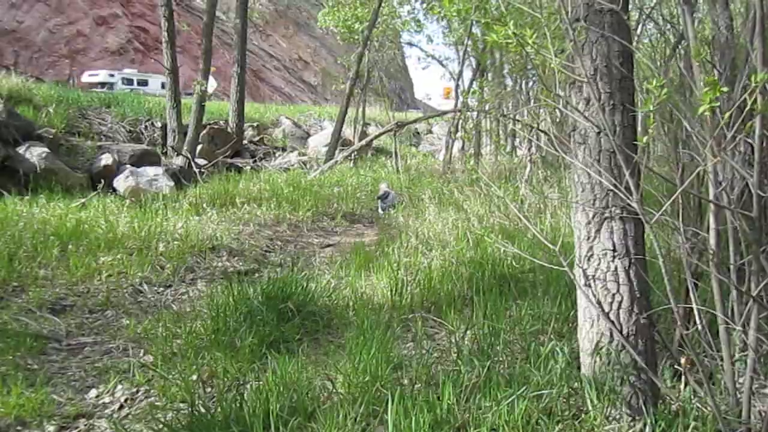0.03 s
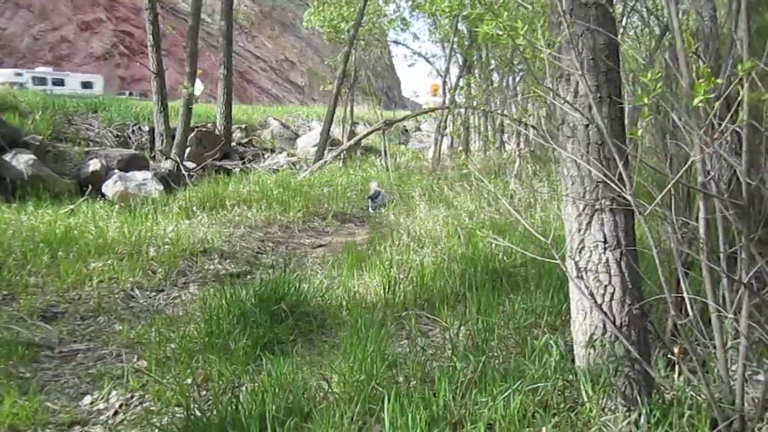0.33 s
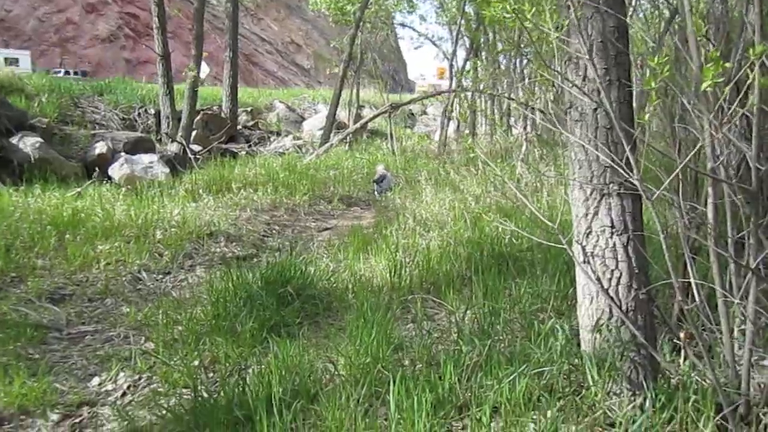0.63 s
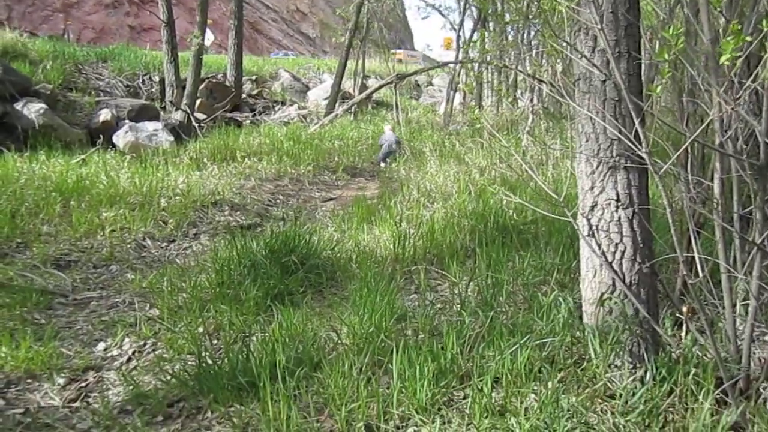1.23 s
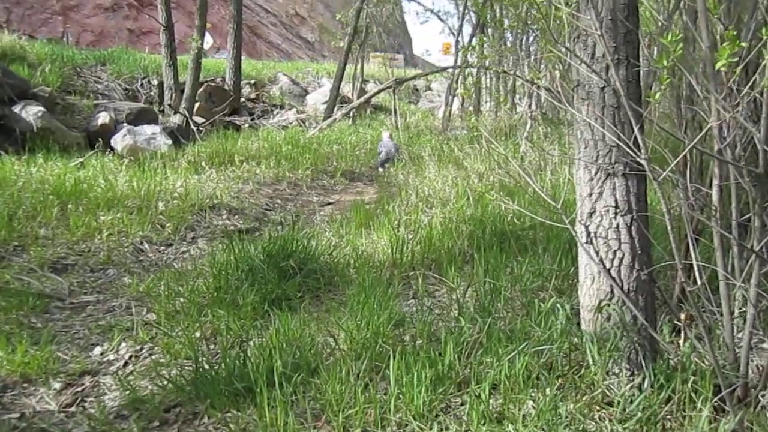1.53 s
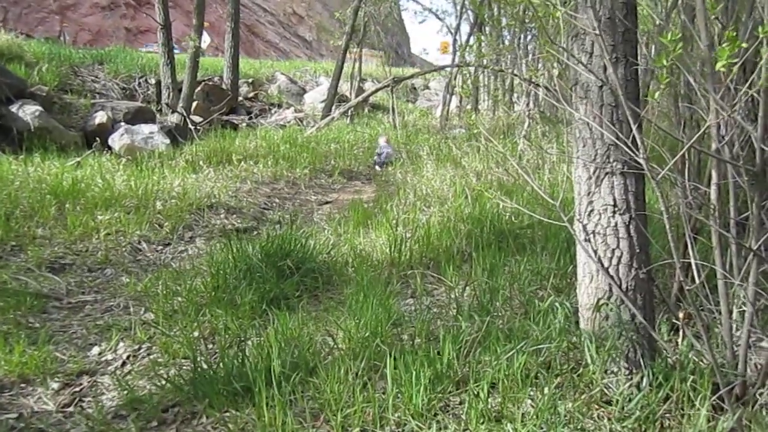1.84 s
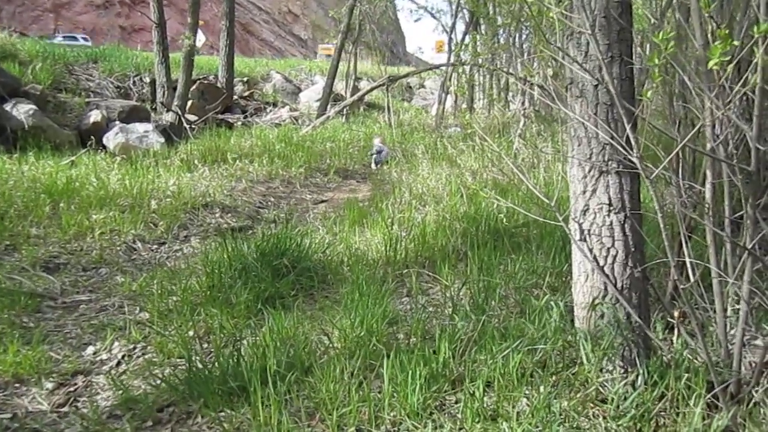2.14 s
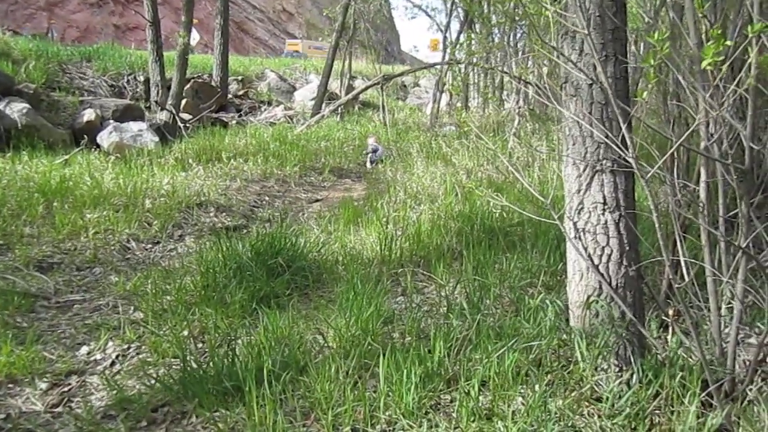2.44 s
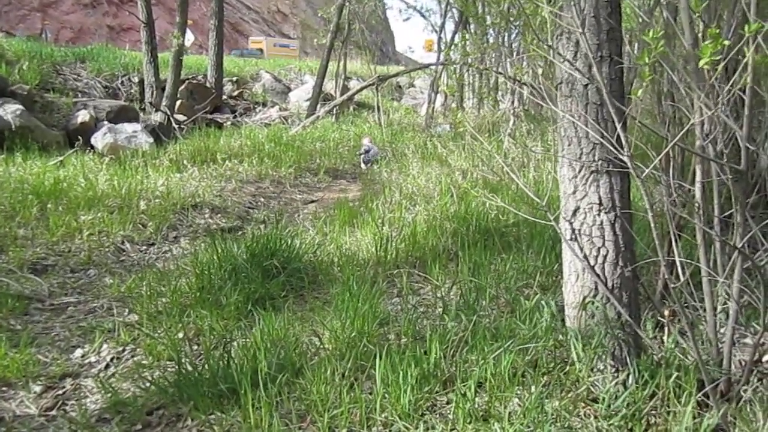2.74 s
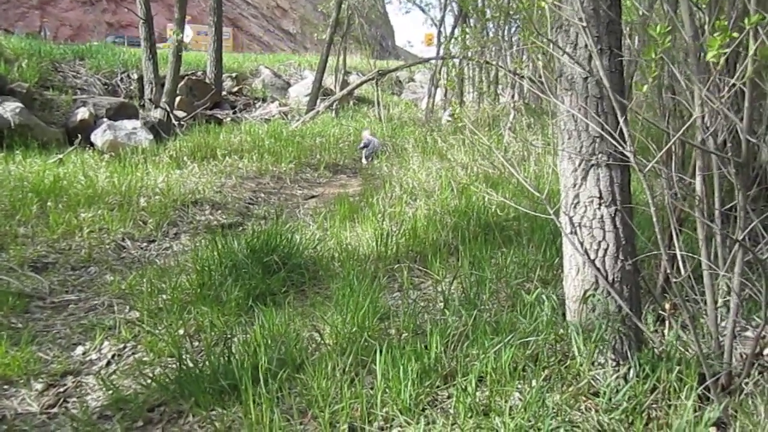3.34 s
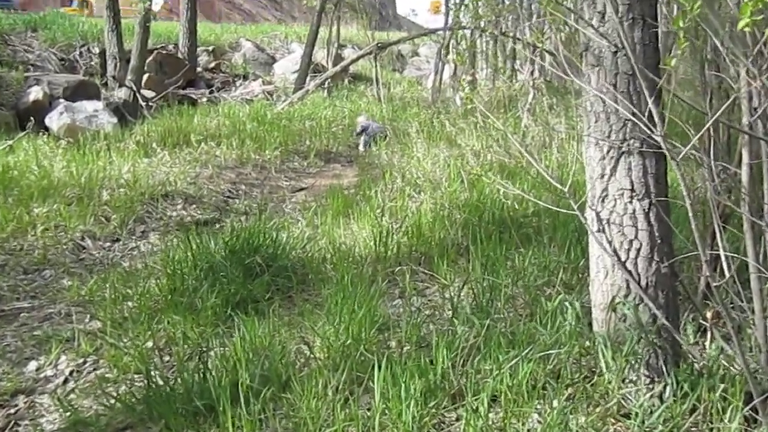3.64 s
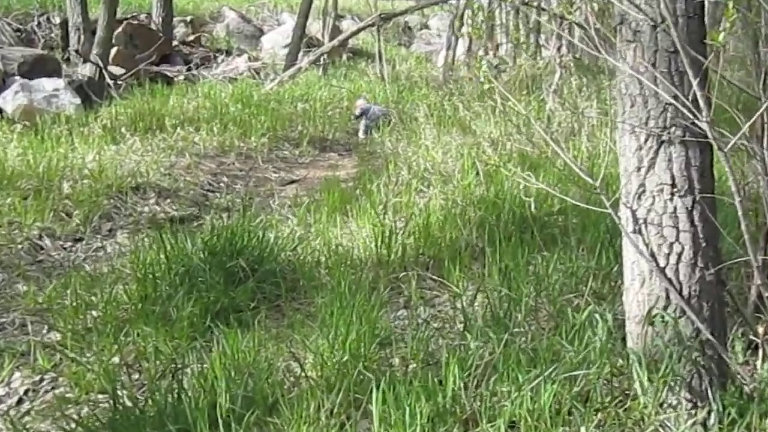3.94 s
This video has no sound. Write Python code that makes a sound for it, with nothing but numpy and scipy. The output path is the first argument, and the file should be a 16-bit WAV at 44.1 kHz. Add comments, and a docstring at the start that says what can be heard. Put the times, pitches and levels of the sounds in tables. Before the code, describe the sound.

Road traffic passes some way off, heard from a grassy outdoor spot: low rumble, engine hum and slowly growing tyre roar under a faint breeze. Close handling of the microphone makes one sharp early click, then scattered light ticks.

```python
"""Highway across a grassy creek bed

Tyre roar swells as vehicles come by, over a low rumble and an airy hiss of breeze and stirring grass.
A camper's engine recedes, a truck and a pickup drone in turn, and tyre treads sing faintly.
Up close, handling a plastic casing makes one sharp click and a few small ticks."""
import sys
import numpy as np
from scipy import signal
from scipy.fft import rfft, irfft, next_fast_len
from scipy.io import wavfile
from scipy.ndimage import uniform_filter1d, map_coordinates

SR = 44100
rng = np.random.default_rng(int(sys.argv[2]) if len(sys.argv) > 2 else 0)


def unload_audio(sound):
    """Save the sound as a 16-bit wav file, at the path given as the first command line argument."""
    columns = np.transpose(np.atleast_2d(sound))
    # keep every value between -1 and 1, then stretch to whole-number steps
    steps = np.round(np.clip(columns, -1, 1) * 32767)
    wavfile.write(sys.argv[1], SR, steps.astype(np.int16))


N = 176400

# tone colours of the noise layers: f/Hz, relative level/dB
BREEZE_SPECTRUM = [(1500, -26), (4000, -14), (6000, 6), (9000, 0), (12000, -5.5), (15500, -12.5)]
GRASS_SPECTRUM = [(3500, -7), (7000, 3), (11000, -4), (15500, -19)]
RUMBLE_SPECTRUM = [(12, -14), (25, -9), (45, -1), (70, 0.5), (100, 0.5), (140, 1), (210, -2.5), (300, -5.5),
                   (400, -10.5), (700, -17), (2000, -46)]
HISS_SPECTRUM = [(700, -22), (1400, -2.5), (1900, 0), (2300, -3.5), (3000, -8), (4700, -13.5), (5600, -18),
                 (7000, -24), (10000, -31.5), (15500, -53)]
BODY_SPECTRUM = [(150, -29), (350, -7), (520, -1.5), (720, -1), (850, -2.5), (1100, -24), (2000, -37)]
ROAR_SPECTRUM = [(500, -23), (740, -3.5), (880, -0.5), (1010, -0.5), (1120, -4), (1240, -6.5), (1450, -14),
                 (2200, -33), (5000, -39)]
# puffs of stirring grass: t/s, length/s, level/dB
GRASS_PUFFS = [(0.24, 0.071, -56.5), (1.698, 0.37, -56.5), (2.88, 0.065, -55), (3.348, 0.054, -53),
               (3.88, .06, -52)]
# touches on the casing: t/s, level/dB (energy spread over 1 ms), centre f/Hz, width/octaves
TOUCHES = [(0.2575, -12, 8040, 1.4), (.3027, -31.5, 5000, 0.87), (0.3202, -31, 3100, 0.84),
           (0.3307, -39, 7800, 0.32), (0.7716, -43, 8990, 0.64), (0.841, -41, 7500, .5),
           (0.853, -35.5, 9450, 0.4), (1.005, -27.5, 5840, 0.57), (2.16, -43, 8500, 0.37),
           (2.8703, -43, 10800, .3), (3.0174, -44, 11000, 0.22), (3.3393, -34, 5100, .25)]
# ringing modes of the plastic casing: f/Hz, level/dB against the snap before colouring, t60/s
CASING_MODES = [(2330, -25, .013), (2800, -31, .008), (3430, -25, .008), (4820, -21, .008),
                (5023, -45, .07), (5600, -24, .011), (7400, -26, .007), (8650, -25, .009),
                (9500, -17, .004), (10030, -49, .04), (12530, -47, .06), (15030, -37, .025)]
# a singing tread and the higher whine of approaching tyres: t/s, f/Hz, level/dB
TREAD_SONG = [(0, 463, -54), (2.5, 467.2, -47), (2.9, 463.3, -38.5), (4, 462, -39)]
TREAD_WHINE = [(0, 930, -49), (.55, 910, -51), (.8, 882, -42), (1.25, 878, -44), (1.9, 962, -45),
               (4, 990, -46)]
# engine notes: t/s, firing f/Hz, level/dB
CAMPER_NOTE = [(0, 76.25, -35.5), (.24, 75.5, -32), (.29, 75.55, -36.5), (.8, 74.7, -40),
               (1.15, 72.98, -52), (1.45, 71.9, -34.5), (1.7, 71, -42), (4, 69.7, -51)]
TRUCK_NOTE = [(0, 113.6, -47), (.9, 113.7, -50), (1.15, 112.6, -32.5), (1.65, 111.1, -40),
              (1.85, 111.1, -31), (2.15, 110.6, -31.5), (2.35, 110.3, -36.5), (2.7, 111.2, -31),
              (3, 109.8, -45), (3.25, 110, -33.5), (3.5, 111.8, -40), (4, 110, -50)]
PICKUP_NOTE = [(0, 125.7, -62), (2.4, 124.8, -53), (3, 123.7, -37), (3.25, 123.4, -44), (3.58, 122, -41.5),
               (3.75, 121.2, -30.5), (4, 121.6, -38.5)]
# engine partials: multiple of the firing rate, relative level/dB
CAMPER_PARTIALS = [(1, -1), (1.5, -6), (2, -6.5), (2.5, -10.5), (3, -17)]
TRUCK_PARTIALS = [(1, -3.5), (2, -11.5), (3, -22)]
PICKUP_PARTIALS = [(1, 0.5), (2, -16.5)]
# the camper's lingering exhaust overtone: t/s, level/dB
CAMPER_OVERTONE = [(0, -43), (.3, -45), (1.4, -44.5), (2.4, -48.5)]
# swell of the traffic: t/s, tyre body level/dB, road hiss level/dB, rumble level/dB
TRAFFIC_SWELL = [(0, -38, -43.5, -35.5), (.5, -41, -45, -36), (1, -36, -41, -32), (1.4, -36, -39, -33),
                 (1.85, -32.5, -37.5, -31), (2.42, -31.5, -37, -29), (2.9, -33, -38, -31),
                 (3.5, -32, -37, -30.5), (4, -31.5, -36, -28.5)]
# swell of the tyre roar: t/s, level/dB
ROAR_SWELL = [(0, -35), (.62, -35.5), (.78, -33.5), (1.14, -32), (1.42, -32.5), (1.9, -29.5), (2.3, -30),
              (2.45, -27.5), (2.57, -32), (2.72, -29), (2.83, -32), (2.93, -28.5), (3.02, -33.5),
              (3.14, -30), (3.36, -30), (3.55, -31.3), (3.75, -30.5), (4, -30.5)]


def amp(db):
    """Decibels to gain."""
    return 10 ** (np.asarray(db) / 20)


def unit(x):
    """Scale to rms 1."""
    return x / np.sqrt(np.mean(x ** 2) + 1e-20)


def curves(rows):
    """One envelope for each column after the time."""
    times, *columns = np.transpose(rows)
    return [np.interp(np.arange(N) / SR, times, column) for column in columns]


def wobble(rate):
    """A smooth random curve, rate knots a second."""
    return map_coordinates(rng.standard_normal(1024), [np.arange(N) * rate / SR + 2], mode="wrap")


def filtered(x, response):
    """Equalise x with a gain given as a function of frequency."""
    size = next_fast_len(N + SR // 2)
    return irfft(rfft(x, size) * response(np.fft.rfftfreq(size, 1 / SR)), size)[:N]


def rush(spectrum, patchy_db):
    """Coloured noise of rms 1 with drifting patches of random gain."""
    bins = signal.stft(rng.standard_normal(N), nperseg=1024)[2]
    patches = uniform_filter1d(rng.standard_normal(bins.shape), size=8, axis=0)  # across frequency
    patches = uniform_filter1d(patches, size=10, axis=1)  # across time
    noise = signal.istft(bins * amp(patchy_db * unit(patches)))[1][:N]
    f, db = np.transpose(spectrum)
    return unit(filtered(noise, lambda hz: amp(np.interp(np.log(hz + 1), np.log(f), db, -120, -120))))


def drone(track, fade_db, drift_rad, drift_rate, partials=((1, 0),)):
    """A distant tone whose partials each fade and drift in phase on the way."""
    hz, db = curves(track)
    phase = 2 * np.pi * np.cumsum(hz) / SR
    out = np.zeros(N)
    for multiple, level in partials:
        drift = rng.uniform(0, 2 * np.pi) + drift_rad * wobble(drift_rate)
        out += amp(db + level + fade_db * wobble(rate=14)) * np.sin(multiple * phase + drift)
    return np.sqrt(2) * out


def breeze(level_db=-57, follow=0.66):
    """Breeze in the leaves: a faint, fluttering top end whose level follows the road hiss."""
    _, hiss_db, _ = curves(TRAFFIC_SWELL)
    swell_db = follow * (hiss_db - hiss_db.mean())
    return amp(level_db + swell_db + 0.64 * wobble(rate=17)) * rush(BREEZE_SPECTRUM, patchy_db=1.3)


def grass():
    """Grass stirs now and then in short, grainy puffs."""
    t = np.arange(N) / SR
    puffs = sum(amp(db) * np.exp(-2 * ((t - s) / length) ** 2) for s, length, db in GRASS_PUFFS)
    grain = amp(3.5 * wobble(rate=250))
    return puffs * unit(grain * rush(GRASS_SPECTRUM, patchy_db=1))


def handling(top_hz=11600, smear_s=.0003, ring_rise_s=.0003, rattle_db=-23, rattle_t60_s=.012):
    """Each touch snaps, rattles and rings the plastic casing, coloured by where it lands."""
    out, t = np.zeros(N + SR), np.arange(SR // 10) / SR
    hz = np.fft.rfftfreq(2 * len(t), 1 / SR)
    snap = signal.unit_impulse(len(t))
    # spread the snap over a fraction of a millisecond to soften its peak
    delay_s = smear_s * np.clip(1 - hz / top_hz, 0, 1)
    snap_softening = np.exp(-2j * np.pi * np.cumsum(delay_s) * hz[1])
    snap_softening /= np.sqrt(1 + (hz / top_hz) ** 18)  # steep high cut
    ring = sum(amp(db - 60 * t / t60) * np.cos(2 * np.pi * f * t) for f, db, t60 in CASING_MODES)
    ring *= 1 - np.exp(-t / ring_rise_s)
    hardest_db = max(row[1] for row in TOUCHES)
    for s, db, centre_hz, octaves in TOUCHES:
        rattle = rng.standard_normal(len(t)) * amp(rattle_db - 60 * t / rattle_t60_s)
        touch = snap + rattle + amp(db - hardest_db) * ring  # light touches hardly ring
        colour = np.exp(-.5 * (np.log2((hz + 1) / centre_hz) / octaves) ** 2)
        click = irfft(rfft(np.pad(touch, (len(t), 0))) * colour * snap_softening)
        click /= np.sqrt(np.sum(click ** 2) / (SR / 1000))  # the energy of 1 ms at rms 1
        out[round(s * SR) - len(t):][:len(click)] += amp(db) * click
    return out[:N]


def treads():
    """Tyre treads sing two faint, blurred notes about an octave apart."""
    song = drone(TREAD_SONG, fade_db=3, drift_rad=1.2, drift_rate=44)
    whine = drone(TREAD_WHINE, fade_db=2, drift_rad=1.2, drift_rate=70)
    return song + whine


def engines():
    """Three exhausts drone at their firing rates; one overtone lingers as the camper recedes."""
    camper = drone(CAMPER_NOTE, fade_db=1, drift_rad=0.2, drift_rate=7.95, partials=CAMPER_PARTIALS)
    truck = drone(TRUCK_NOTE, fade_db=3, drift_rad=0.43, drift_rate=18, partials=TRUCK_PARTIALS)
    pickup = drone(PICKUP_NOTE, fade_db=2, drift_rad=1, drift_rate=15, partials=PICKUP_PARTIALS)
    camper_s, camper_hz, _ = np.transpose(CAMPER_NOTE)
    track = [(s, np.interp(s, camper_s, camper_hz), db) for s, db in CAMPER_OVERTONE]
    overtone = drone(track, fade_db=1, drift_rad=0.71, drift_rate=17, partials=[(4.5, 0)])
    return camper + truck + pickup + overtone


def road():
    """Tyre roar, its lower body, hiss and rumble swell with the traffic; moving air makes them waver."""
    roar_db, = curves(ROAR_SWELL)
    body_db, hiss_db, rumble_db = curves(TRAFFIC_SWELL)
    waver_db = 0.36 * wobble(rate=6.84) + 0.21 * wobble(rate=15)
    roar = amp(roar_db + waver_db) * rush(ROAR_SPECTRUM, patchy_db=0.2)
    body = amp(body_db + waver_db + 0.43 * wobble(rate=15)) * rush(BODY_SPECTRUM, patchy_db=0.64)
    hiss = amp(hiss_db + waver_db) * rush(HISS_SPECTRUM, patchy_db=0.4)
    rumble = amp(rumble_db + 0.36 * wobble(rate=8.4)) * rush(RUMBLE_SPECTRUM, patchy_db=0.17)
    return roar + body + hiss + rumble


def scene():
    """Mono mix of the highway, the greenery and the close clicks."""
    return (road() + breeze() + grass() + engines() + treads() + handling())[None]


def record(dry, start_s=0.034, fade_s=.004, top_hz=16000):
    """A quick fade-in just after the start, then a steep high cut."""
    fade_in = np.clip((np.arange(N) / SR - start_s) / fade_s, .01, 1)
    return filtered(dry[0] * fade_in, lambda hz: np.clip((top_hz - hz) / 300 + .5, 0, 1))[None]


dry = scene()
out = record(dry)
unload_audio(out)
```